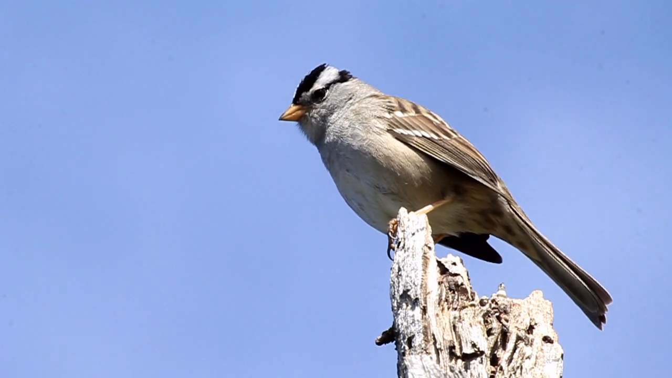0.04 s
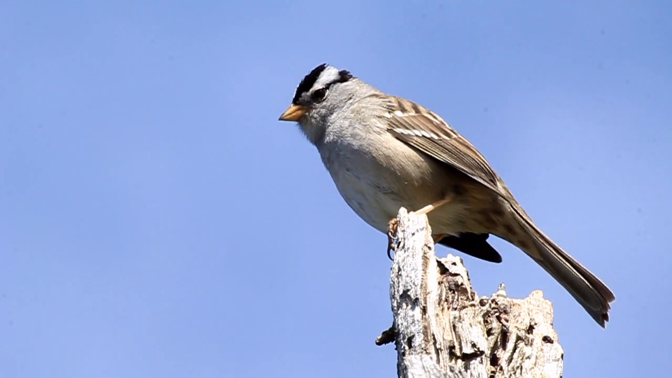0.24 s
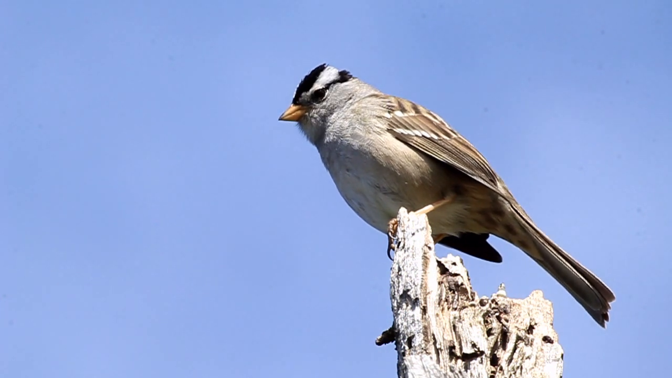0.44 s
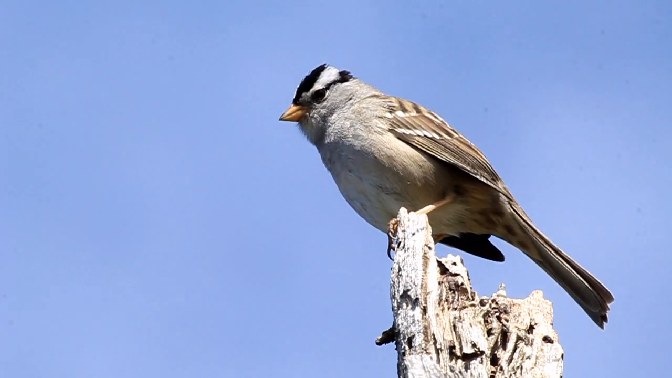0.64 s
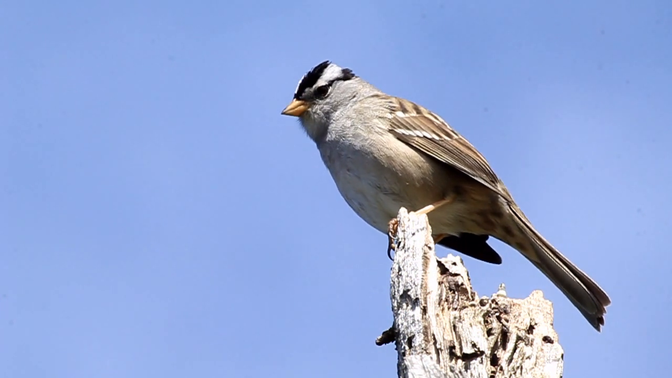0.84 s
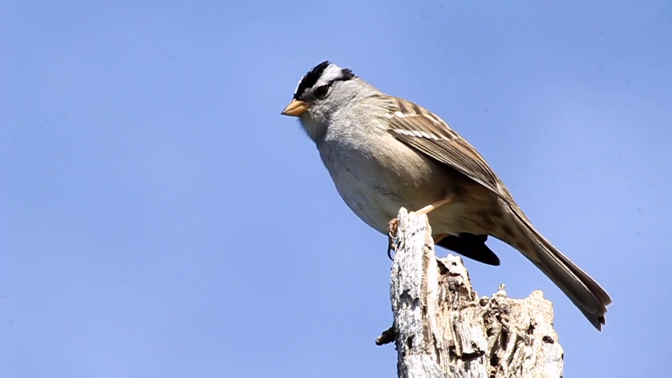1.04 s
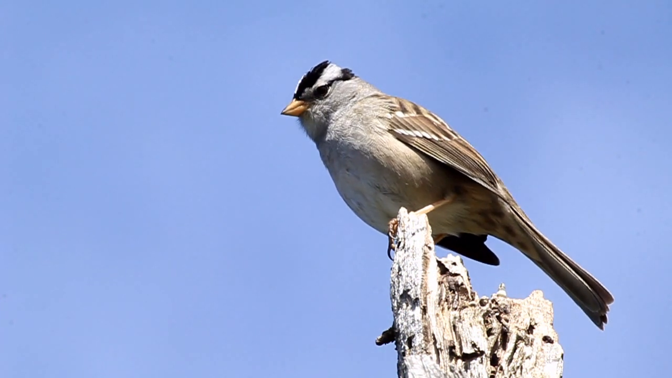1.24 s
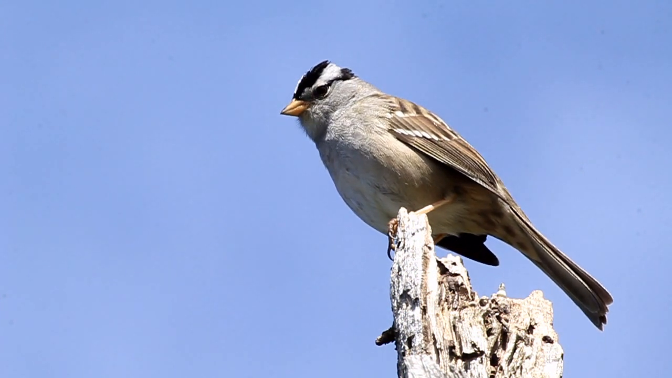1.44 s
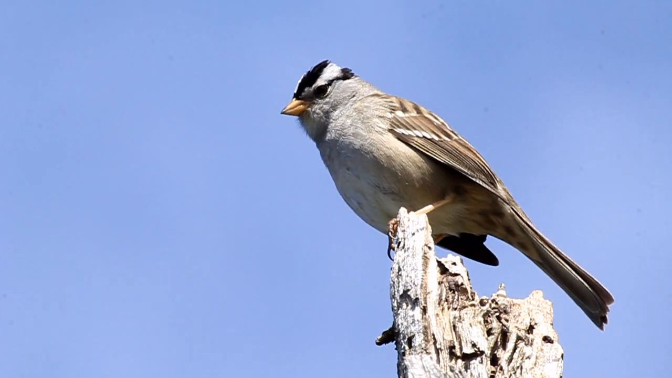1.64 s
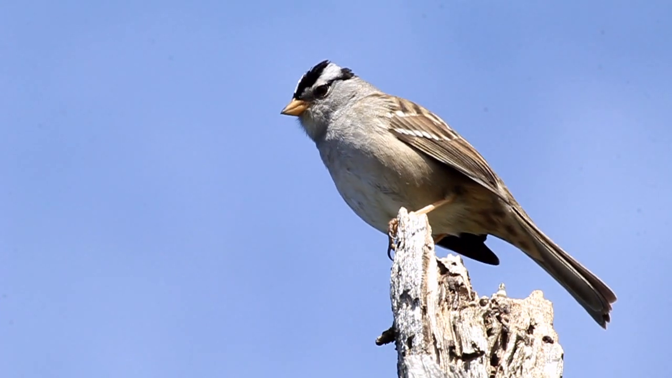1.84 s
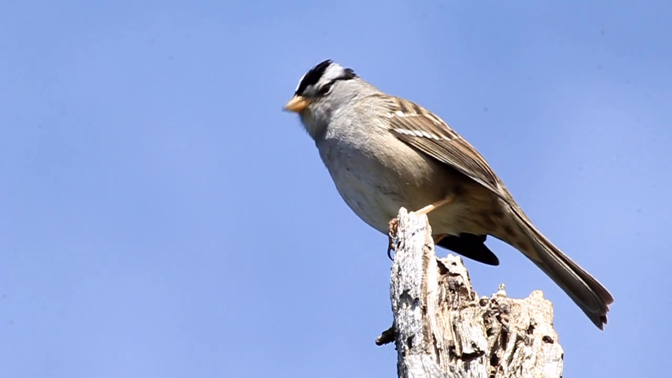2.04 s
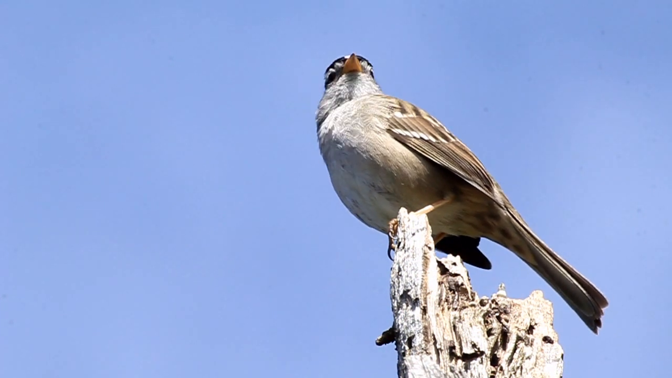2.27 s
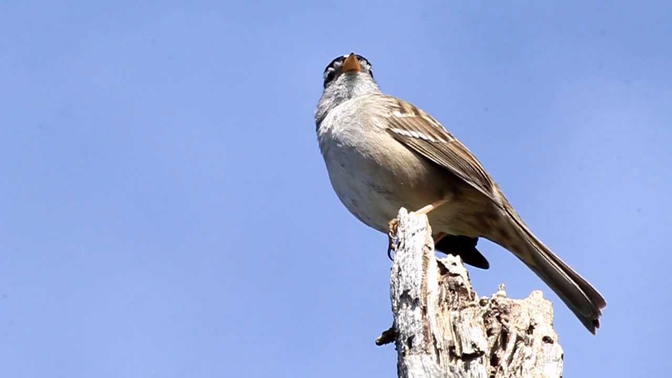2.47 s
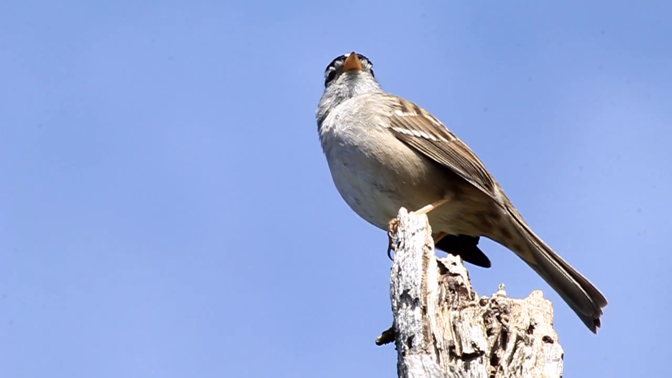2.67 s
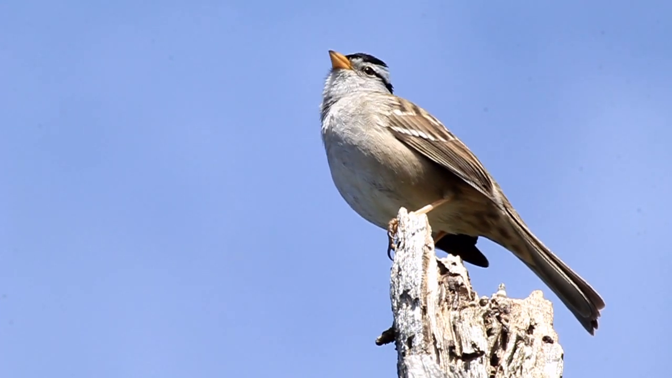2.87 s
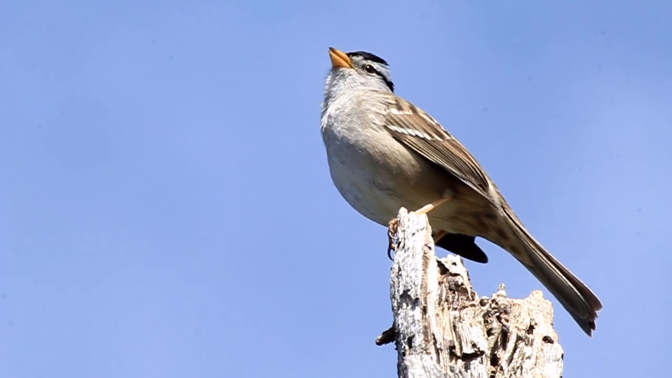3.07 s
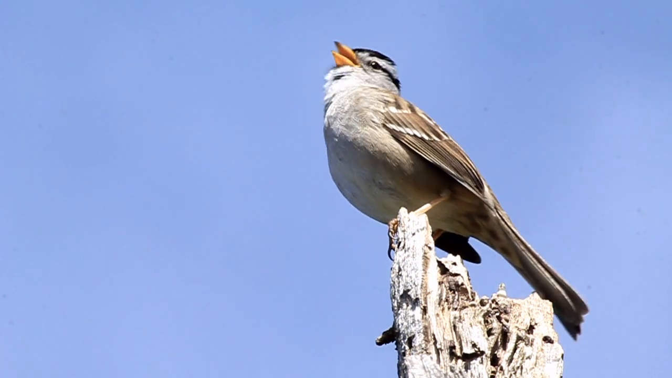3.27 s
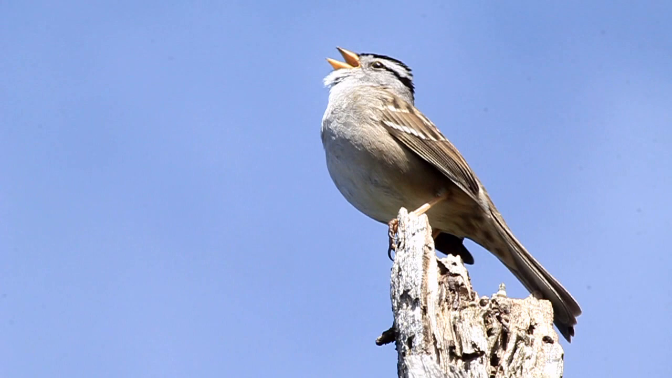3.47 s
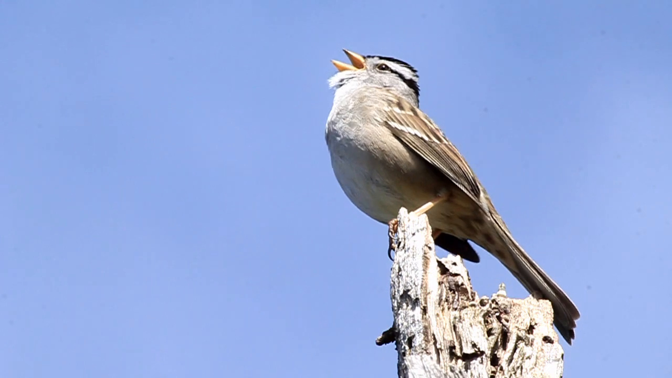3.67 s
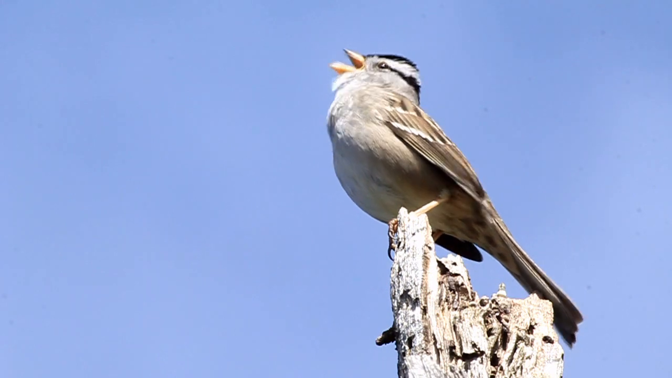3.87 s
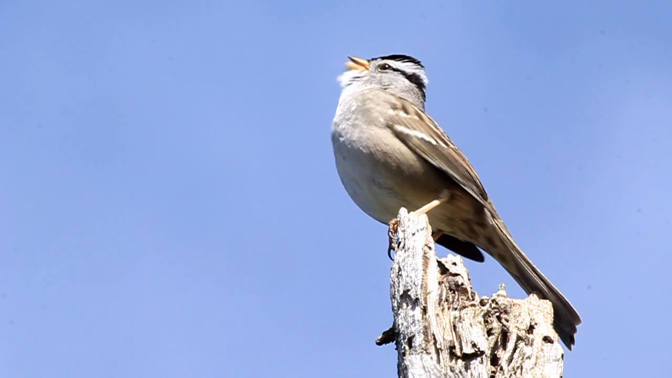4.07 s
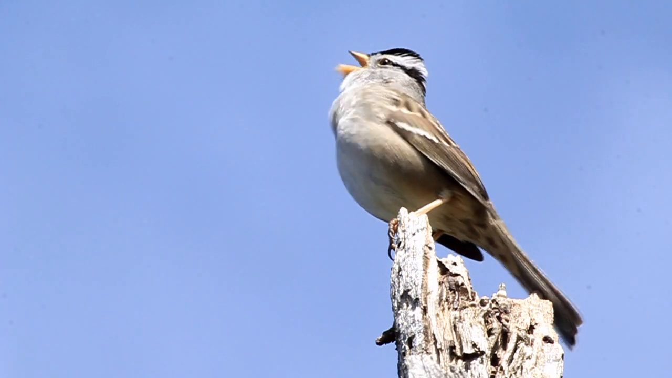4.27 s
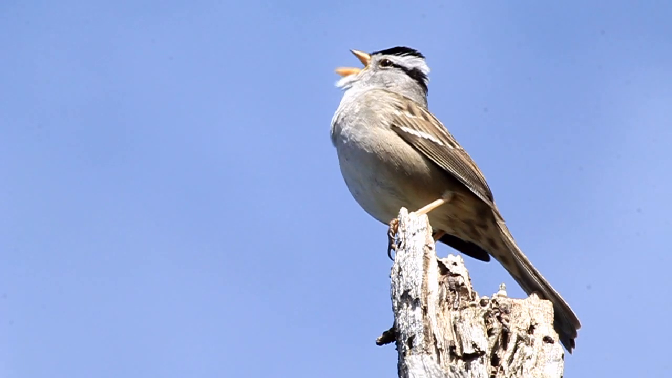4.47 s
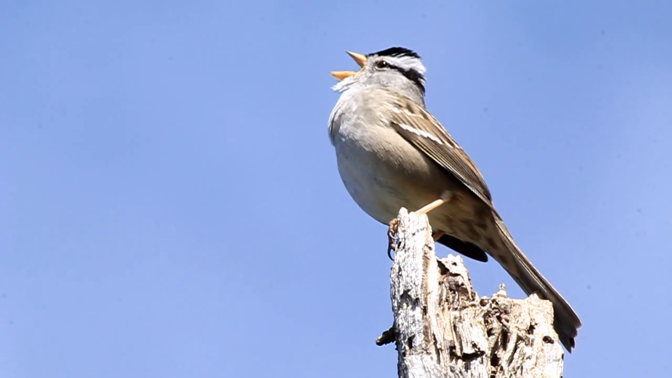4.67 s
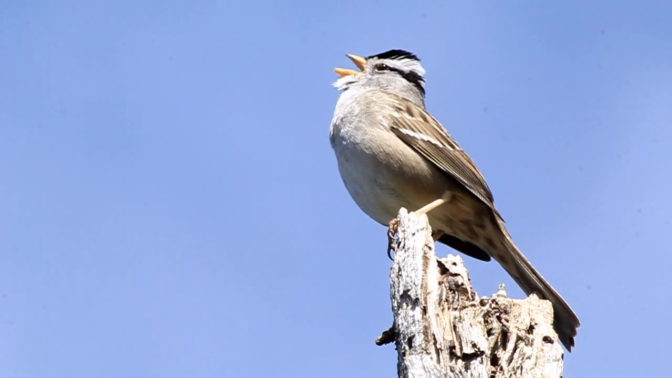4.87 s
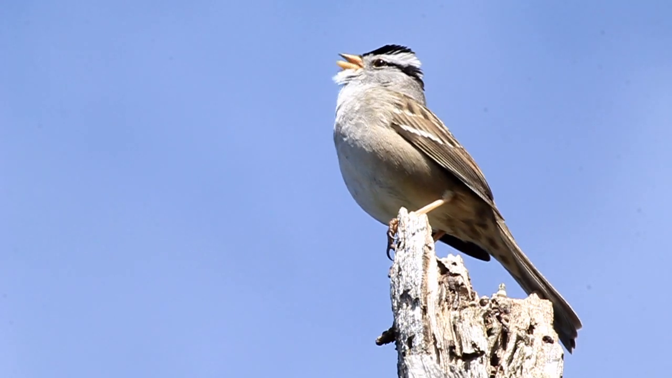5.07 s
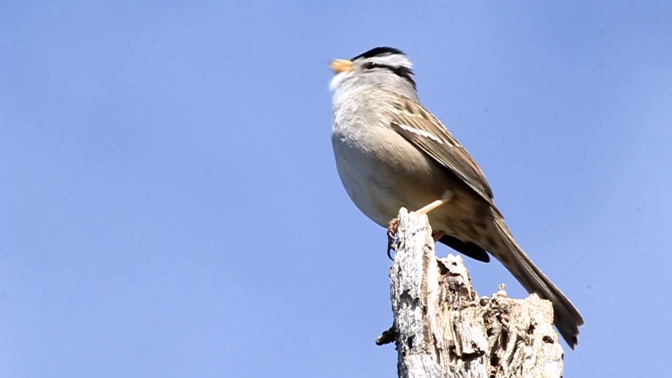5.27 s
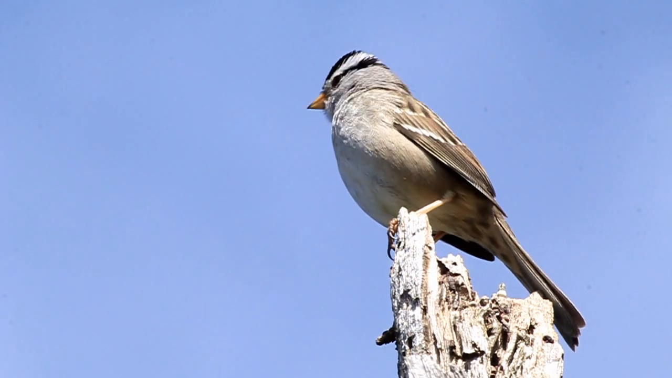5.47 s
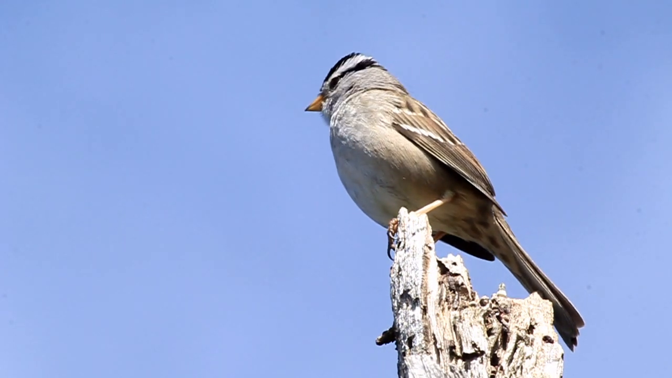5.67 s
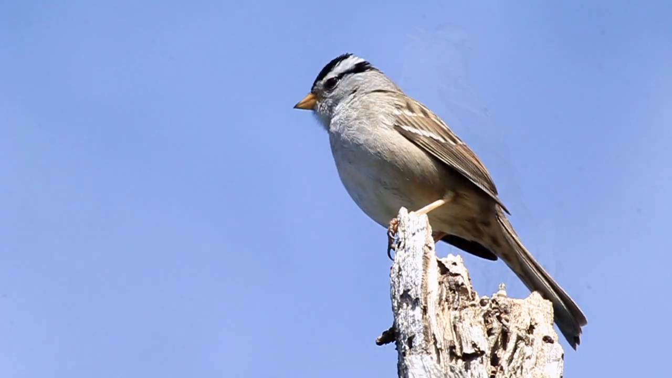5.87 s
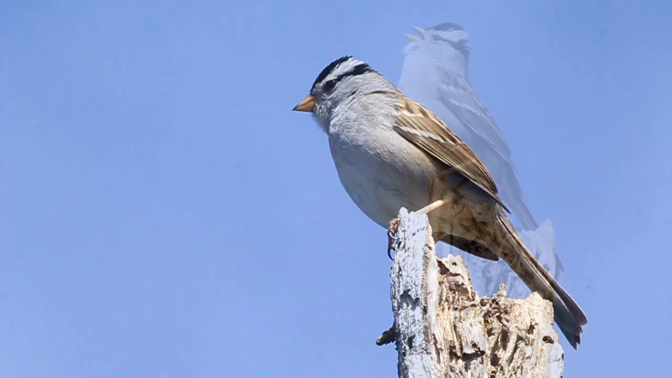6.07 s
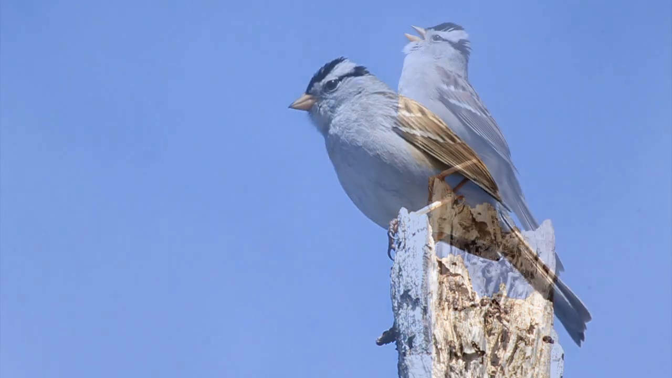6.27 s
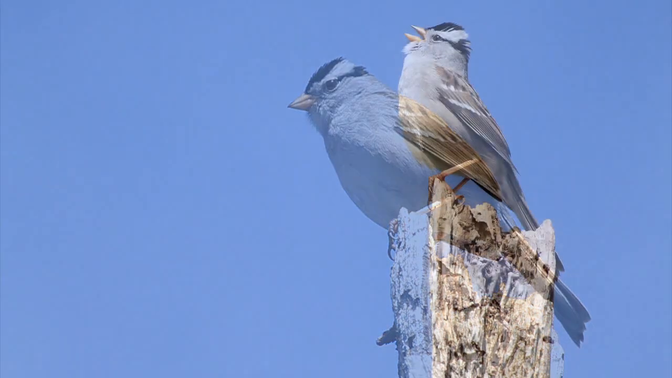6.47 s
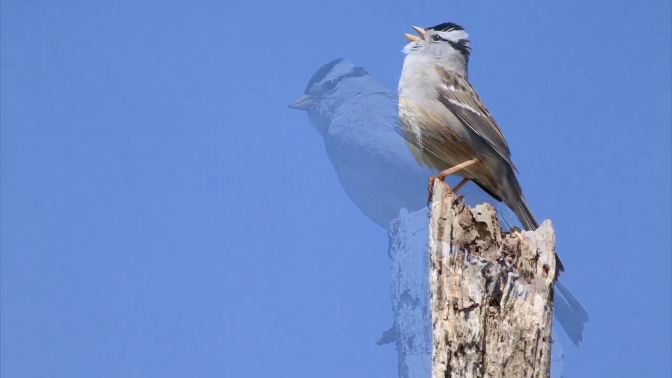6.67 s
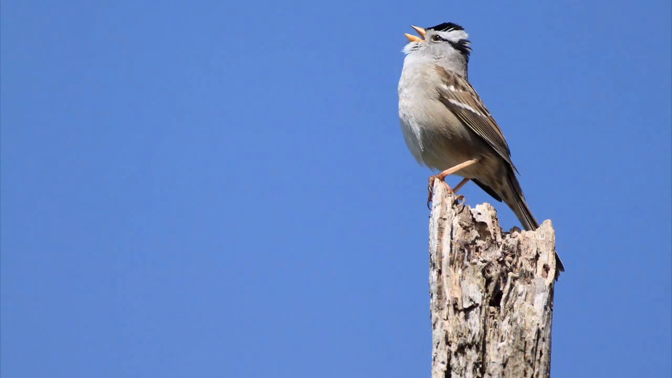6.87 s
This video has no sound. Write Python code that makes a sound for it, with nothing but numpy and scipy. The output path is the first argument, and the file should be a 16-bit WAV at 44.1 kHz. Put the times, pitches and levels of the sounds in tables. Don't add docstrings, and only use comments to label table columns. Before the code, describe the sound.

Outdoors, low rumble and soft hiss with a faint far engine drone. A distant sparrow whistles and sings first, and scattered faint chirps follow. Then a sparrow on a post near the microphone sings much louder: a pure pulsed whistle, quick slurs and trills, a buzz, a falling note. Distant birds and hoarse low calls continue until an abrupt cut.

```python
import sys
import numpy as np
from scipy import signal
from scipy.fft import rfft, irfft
from scipy.io import wavfile
from scipy.ndimage import uniform_filter1d, map_coordinates

SR = 44100
rng = np.random.default_rng(int(sys.argv[2]) if len(sys.argv) > 2 else 0)


def natural_amplitude(level_db):
    exponent = np.asarray(level_db, float) / 20
    return 10 ** exponent


def master(y):
    cut = np.clip(np.atleast_2d(y).T, -1, 1)
    pcm = np.round(cut * 32767)
    wavfile.write(sys.argv[1], SR, pcm.astype(np.int16))


N = 305157


def unit(x):
    return x / np.sqrt(np.mean(x ** 2) + 1e-20)


def along(points, hz):
    f, value = np.transpose(points)
    return np.interp(np.log(hz + 1), np.log(f + 1), value)


def wobble(rate, size=N):
    knots = rng.standard_normal(int(size * rate / SR) + 4)
    return map_coordinates(knots, [np.arange(size) * rate / SR])


def add(track, s, sound):
    track[round(s * SR):][:len(sound)] += sound


def columns(rows):
    s, *cols = np.transpose(rows)
    t = np.arange(s[0], s[-1], 1 / SR)
    return s[0], [uniform_filter1d(np.interp(t, s, c), size=240, mode="nearest") for c in cols]


def rush(spectrum, level, patchy_db):
    top_hz = 13280
    hz, t, z = signal.stft(rng.standard_normal(N + 4096), SR, nperseg=2048)
    patches = uniform_filter1d(uniform_filter1d(rng.standard_normal(z.shape), 14, 0), 3, 1)
    colour = natural_amplitude(along(spectrum, hz)) * (hz < top_hz)
    z = z * colour[:, None] * natural_amplitude(patchy_db * unit(patches))
    noise = signal.istft(z, SR, nperseg=2048)[1][:N]
    return unit(noise) * natural_amplitude(np.interp(np.arange(N) / SR, *np.transpose(level)))


# (frequency [Hz], density [dB per Hz])
AIR_SPECTRUM = [(12, -47.5), (20, -47.5), (64, -2.5), (99, 3), (220, -8), (922, -17.5), (1510, -25),
                (3100, -26.5), (3970, -27.5), (6000, -30), (12300, -33.5), (13300, -38.5), (14500, -86.5)]
# (time [s], level [dB])
AIR_LEVEL = [
    (0, -47),
    (4.33, -47),
    (4.44, -49.5),
    (4.98, -49.5),
    (5.04, -47),
]
# (frequency [Hz], density [dB per Hz])
ENGINE_SPECTRUM = [(55, -32.5), (76, -4), (84, 12), (95, 3.5), (130, -35.5)]
# (time [s], level [dB])
ENGINE_LEVEL = [(0, -56), (.6, -51), (2.1, -50), (2.3, -58), (3.4, -52.5), (4.3, -51), (4.55, -57),
                (5.1, -52), (6.9, -54)]


def distant_rumble():
    air = rush(AIR_SPECTRUM, AIR_LEVEL, patchy_db=0.95)
    return air + natural_amplitude(-2.0) * rush(ENGINE_SPECTRUM, ENGINE_LEVEL, patchy_db=2.2)


# (frequency [Hz], density [dB per Hz])
CHORUS_SPECTRUM = [(1500, -35), (2100, -3), (3000, -3), (4000, 5.5), (5200, -4.5), (6500, -51)]
# (time [s], level [dB])
CHORUS_LEVEL = [(0, -92.5), (1, -73.5), (2.001, -58.5), (3, -66), (5.302, -59.5), (6, -61), (6.9, -53.5)]


def distant_chorus():
    return rush(CHORUS_SPECTRUM, CHORUS_LEVEL, patchy_db=6.0)


def tail(decay, db):
    hz, t, z = signal.stft(rng.standard_normal(SR), SR, nperseg=128)
    fading = z * natural_amplitude(-60 * t / along(decay, hz)[:, None])
    noise = signal.istft(fading, SR, nperseg=128)[1]
    return natural_amplitude(db) * noise / np.linalg.norm(noise)


# (frequency [Hz], decay time to -60 dB [s])
TWIG_DECAY = [(2000, 0.19), (14000, 0.043)]
# (frequency [Hz], decay time to -60 dB [s])
SCRUB_DECAY = [(2000, 1), (4500, 0.88), (8000, 0.9), (14000, 0.2)]
# (delay [s], level [dB])
REFLECTIONS = [
    (.020, -23),
    (.062, -31),
]


def scrub(near_db, tail_db):
    answer = np.pad(tail(TWIG_DECAY, near_db) + tail(SCRUB_DECAY, tail_db), (130, 0))
    for delay, db in REFLECTIONS:
        add(answer, delay, natural_amplitude(db) * rng.standard_normal(144) / 12)
    return answer


def echoed(x, answer):
    band_hz = 15250
    heard = rfft(x + signal.fftconvolve(x, answer)[:N])
    return irfft(heard * (np.fft.rfftfreq(N, 1 / SR) < band_hz), N)


# (frequency [Hz], gain [dB])
THROAT = [(1800, -24), (3300, -13), (4100, -6), (4550, 0), (5100, -7), (6000, -14), (7000, -20),
          (9500, -44)]
# (multiple of the pitch, level [dB])
OVERTONES = [
    (2, -43),
    (3, -38),
    (4, -52),
]
# (frequency [Hz], gain [dB])
BEAK = [(3000, 7), (6200, 14), (7600, 1.5), (10000, -2), (12000, -1.5), (14000, 12), (15200, 3)]


def syrinx(pitch_hz, gain, overtone_db, throat=0, rasp=.22, halo_db=-38):
    size = len(pitch_hz)
    phase = 2 * np.pi * (np.cumsum(pitch_hz) / SR + rng.random())
    halo = natural_amplitude(halo_db) * wobble(1500, size=size)
    tone = natural_amplitude(throat * along(THROAT, pitch_hz)) * (1 + halo) * np.sin(phase)
    push = (gain / natural_amplitude(-20)) ** .3
    for k, db in OVERTONES:
        level = push * natural_amplitude(db + overtone_db + along(BEAK, k * pitch_hz))
        tone = tone + level * np.sin(k * phase + rasp * wobble(2500, size=size))
    return np.sqrt(2) * gain * tone


def glides(rows, swell, flutter_db, overtone_db, throat):
    out = np.zeros(N + SR)
    for s, length, start, middle, end, db in rows:
        u = np.linspace(0, 1, int(length * SR))
        pitch = start * (1 - u) * (1 - 2 * u) + 4 * middle * u * (1 - u) + end * u * (2 * u - 1)
        shape = np.abs(np.sin(np.pi * u)) ** (swell * min(1, .07 / length))
        gain = natural_amplitude(db + flutter_db * wobble(22.1, size=len(u))) * shape
        add(out, s, syrinx(pitch, gain, overtone_db, throat))
    return out[:N]


def slurs(notes, waver, overtone_db, ring_db=0):
    ring_hz, ring_width_hz = 4470, 170
    out = np.zeros(N)
    for note in notes:
        s, (pitch, db) = columns(note)
        edge = signal.windows.tukey(len(pitch), 260 / len(pitch))
        flare = ring_db * np.exp(-((pitch - ring_hz) / ring_width_hz) ** 2)
        lift = .5 * along(THROAT, pitch)
        wavering = pitch * (1 + waver * wobble(90, size=len(pitch)))
        add(out, s, syrinx(wavering, natural_amplitude(db + flare) * edge, overtone_db - lift))
    return out


def breaths(rows, rest_hz):
    settle_s, swell_s, swell_bend = .075, .17, 1.4
    note = []
    for s, length, start, soft_db, full_db in rows:
        t = np.linspace(0, length, num=24)
        rise = np.clip(1 - t / min(swell_s, length), 0, 1) ** swell_bend
        pitch = rest_hz + (start - rest_hz) * np.exp(-t / settle_s)
        note += list(zip(s + t, pitch, full_db - (full_db - soft_db) * rise))
    return note


def chirps(rows):
    depth, rate = (.19, .38), (131, 113)
    ends = rows[0][0], rows[-1][0]
    return [(s, top, np.interp(s, ends, depth), np.interp(s, ends, rate), db) for s, top, db in rows]


def buzz(rows, overtone_db):
    s, (top, depth, rate, db) = columns(rows)
    out = np.zeros(N)
    sounding = .65
    edge = signal.windows.tukey(len(rate), 400 / len(rate))
    for lag, stretch in [(0, 1.0), (.52, 1.04)]:
        turns = np.cumsum(rate) / SR / 2 + 1 - lag + 0.0047 * wobble(51, size=len(rate))
        luck = rng.standard_normal((80, 2))[turns.astype(int)]
        u = np.clip(turns % 1 / sounding, 0, 1)
        climb = (1 - u) ** 2.3
        pitch = stretch * top * (1 - depth * climb + 0.012 * luck[:, 0])
        gain = natural_amplitude(db + luck[:, 1]) * np.abs(np.sin(np.pi * u)) ** 0.95
        add(out, s, syrinx(pitch, gain * edge, overtone_db, throat=0.82, rasp=.7, halo_db=-22))
    return out


# (time [s], peak level [dB])
COOS = [(5.4231, -50), (5.5712, -51), (5.7503, -50), (5.902, -56), (6.0796, -52), (6.1913, -53),
        (6.346, -50), (6.4971, -51), (6.6583, -47.5)]


def hoarse_calls():
    out = np.zeros(N)
    t = np.arange(2400) / SR
    for s, db in COOS:
        carrier = wobble(510, size=len(t)) * np.sin(2 * np.pi * 2080 * t)
        add(out, s, natural_amplitude(db - 7.5) * np.hanning(len(t)) * carrier)
    return out


# (time [s], length [s], start [Hz], end
# [Hz], level [dB])
FAR_STROKES = [(.49, .11, 5440, 4250, -55.5), (.72, .075, 3330, 3700, -56), (.87, .05, 5640, 4100, -52),
               (.895, .058, 4300, 3200, -43), (.95, .017, 5870, 4160, -56), (.99, .03, 3430, 4740, -57),
               (1.01, .12, 5900, 4140, -47.5), (1.07, .06, 4630, 3100, -54.5), (1.2, .06, 5700, 3750, -59),
               (1.31, .095, 5700, 3560, -45), (1.44, .047, 3140, 4470, -45), (1.53, .076, 4800, 3400, -45),
               (1.61, .075, 4200, 3160, -57), (2.05, .2, 4240, 2554, -51), (1.454, .037, 2610, 2190, -60),
               (1.725, .074, 3000, 2260, -60),
               (2.39, .135, 4070, 2680, -50), (2.37, .1, 2850, 2900, -59), (2.47, .105, 2550, 1750, -55),
               (2.53, .07, 3000, 2100, -57), (2.625, .035, 2450, 2920, -58), (2.67, .105, 2680, 1780, -52),
               (2.8, .1, 3410, 2050, -54), (2.87, .09, 2650, 1850, -50), (3.0, .042, 2400, 3600, -56),
               (3.05, .06, 3600, 2350, -58), (3.1, .016, 2000, 1980, -45), (3.22, .025, 3696, 2800, -62.5),
               (3.255, .016, 2020, 2000, -46), (3.33, .055, 2350, 3300, -54),
               (3.67, .06, 3080, 1950, -52.5), (3.67, .033, 3340, 2850, -59), (3.82, .033, 2430, 2780, -54),
               (5.26, .033, 5420, 4340, -55), (5.44, .052, 3680, 3700, -57), (5.59, .06, 5360, 3720, -55),
                (5.77, .085, 5150, 3170, -53), (5.71, .025, 3500, 4000, -58), (5.62, .2, 3800, 3790, -63),
                (6.07, .093, 4260, 3600, -63), (6.19, .06, 5670, 3780, -51.5),
                (6.255, .09, 4000, 2890, -52), (6.28, .038, 2800, 3300, -61), (6.35, .04, 2910, 2560, -61),
                (6.525, .055, 5760, 3720, -49), (6.645, .025, 3400, 4140, -49),
                (6.7, .078, 5400, 3250, -49), (6.765, .04, 2900, 2140, -54), (6.37, .04, 7640, 8040, -54),
                (6.39, .04, 7500, 7280, -62)]
# (time [s], length [s], edge [Hz], crest [Hz], level [dB])
ARCHES = [
    (2.268, .036, 3250, 3900, -57),
    (2.67, .065, 3350, 4200, -58),
    (3.01, .085, 2050, 2680, -51),
    (3.17, .08, 2000, 2700, -52),
    (3.548, .05, 3320, 3020, -52),
]
# (time [s], pitch [Hz], level [dB])
FAR_SCOOP = [
    (1.125, 3150, -56),
    (1.155, 2930, -49),
    (1.19, 3050, -49),
    (1.222, 3420, -46),
]
# (rest [Hz], breaths of (time [s], length [s], start [Hz], soft level [dB], full level [dB]))
FAR_WHISTLES = [
    (3980, [(0, .075, 3990, -66, -59), (.1, .04, 3985, -74, -64), (.16, .055, 3980, -74, -62), (.225, .04, 3980, -68, -66)]),
    (3860, [(.235, .11, 4150, -60, -48), (.358, .14, 4000, -54, -41), (.53, .04, 3880, -52, -43), (.61, .175, 3935, -43, -43)]),
    (4210, [(5.49, .195, 4310, -66, -53), (5.7, .215, 4240, -58, -52), (5.93, .06, 4230, -60, -51), (6.0, .165, 4220, -60, -62)]),
    (3620, [(6.16, .15, 3600, -61, -64), (6.33, .095, 3630, -56, -53), (6.44, .14, 3620, -62, -62)]),
]
# (time [s], top of the chirps [Hz], level [dB])
FAR_BUZZ = [
    (1.68, 5780, -55),
    (1.76, 5400, -52),
    (1.9, 4900, -53.5),
    (1.97, 4700, -58),
]


def neighbours():
    sag = .42
    strokes = [(s, length, a, min(a, b) + sag * abs(a - b), b, db)
               for s, length, a, b, db in FAR_STROKES]
    arches = [(s, length, edge, crest, edge, db) for s, length, edge, crest, db in ARCHES]
    quick = glides(strokes + arches, swell=0.45, flutter_db=2.5, overtone_db=-33, throat=0.28)
    whistles = [breaths(rows, rest_hz) for rest_hz, rows in FAR_WHISTLES]
    held = slurs(whistles + [FAR_SCOOP], waver=0.0015, overtone_db=-30)
    return natural_amplitude(1.8) * quick + hoarse_calls() + held + buzz(chirps(FAR_BUZZ), overtone_db=-32.5)


# (length [s], start [Hz], middle [Hz], end [Hz])
TICK, PLUNGE, TRILL = (.0105, 9500, 6600, 8600), (.0082, 8750, 6270, 3700), (.0078, 4600, 7000, 4150)
CHIP, STOP, GRACE = (.009, 5500, 4000, 3480), (.005, 3670, 3420, 2850), (.049, 7100, 6400, 4800)
# (shape, time [s], pitch factor, level [dB])
FLICKS = [(TICK, 3.8645, 1.0, -13), (GRACE, 3.895, 1.0, -20.5), (PLUNGE, 3.9365, 1.04, -11),
          (TICK, 4.278, 1.0, -11.5), (PLUNGE, 4.376, .98, -12.5), (PLUNGE, 4.383, .84, -14.5),
          (TRILL, 4.389, .86, -10), (PLUNGE, 4.3965, .87, -12), (CHIP, 4.972, .95, -28),
          (CHIP, 4.979, .98, -23.5), (CHIP, 4.9875, .98, -15), (CHIP, 4.9955, 1.05, -14.5),
          (STOP, 3.779, 1.0, -21), (STOP, 4.204, 1.0, -22)]
# (time [s], length [s], start, middle, end [Hz], level [dB])
LANDING = (4.400, .014, 4740, 4250, 4350, -13)


def flicks():
    trill = [(TRILL, 3.9442 + k * .00715, 1, -4.5 - k * 3) for k in range(3)]
    rows = [(s, length, *np.multiply(hz, factor), db)
            for (length, *hz), s, factor, db in FLICKS + trill]
    return glides(rows + [LANDING], swell=.8, flutter_db=0, overtone_db=-1, throat=1)


# (time [s], length [s], start [Hz], soft level [dB], full level [dB])
WHISTLE = [
    (3.22, .134, 4330, -60, -16.5),
    (3.376, .146, 3947, -28, -16.5),
    (3.546, .236, 3900, -25, -13.5),
]
HOOK = [
    (3.877, 3440, -40),
    (3.899, 3526, -21.5),
    (3.907, 3387, -16),
    (3.927, 2880, -38),
    (3.935, 2520, -36),
]
DIVE = [
    (3.967, 6950, -33),
    (3.981, 5630, -20.7),
    (3.989, 5050, -11),
    (3.998, 4700, -21),
    (4.005, 4510, -16),
    (4.019, 4150, -16.5),
    (4.035, 3800, -17),
    (4.055, 3340, -20),
    (4.069, 2876, -31),
]
SCOOP = [
    (4.081, 2643, -33),
    (4.099, 2800, -37),
    (4.123, 3256, -21.5),
    (4.141, 3540, -19.2),
    (4.165, 3595, -17),
    (4.206, 3595, -17),
]
DROP = [
    (4.29, 5240, -41),
    (4.296, 5240, -24),
    (4.308, 5000, -19.5),
    (4.346, 4120, -15),
    (4.368, 3490, -21.5),
    (4.376, 3280, -38),
]
ARC = [
    (4.414, 3030, -37),
    (4.43, 3320, -21),
    (4.448, 3920, -16),
    (4.466, 4740, -23),
    (4.486, 4800, -17.5),
    (4.526, 4060, -16.5),
    (4.56, 3346, -19.5),
    (4.568, 3100, -32),
]
ENDING = [
    (5.002, 3800, -25),
    (5.028, 3556, -18.5),
    (5.055, 3260, -21),
    (5.088, 2904, -29),
    (5.158, 2445, -36.5),
    (5.198, 2220, -39.5),
    (5.256, 2030, -46),
]
# (time [s], top of the chirps [Hz], level [dB])
BUZZ = [
    (4.626, 4900, -27.5),
    (4.66, 4880, -15),
    (4.73, 4720, -10),
    (4.843, 4520, -12),
    (4.853, 4450, -15.5),
    (4.919, 4200, -19),
]


def sparrow():
    song = [breaths(WHISTLE, rest_hz=3825), HOOK, DIVE + SCOOP, DROP, ARC, ENDING]
    slurred = slurs(song, waver=0.0007, overtone_db=0, ring_db=6.5)
    return slurred + flicks() + buzz(chirps(BUZZ), overtone_db=2.5)


def scene():
    background = distant_rumble() + distant_chorus()
    far = echoed(neighbours(), scrub(near_db=-10.5, tail_db=-15.5))
    near = echoed(sparrow(), scrub(near_db=-18, tail_db=-24))
    mono = background + far + near
    return np.array([mono, mono])


def roll_off(x):
    return signal.sosfilt(signal.butter(12, 15710, fs=SR, output="sos"), x)


def record(dry):
    cut, offset = 302344, .1322
    after = np.arange(N) >= cut
    mix = np.where(after, [[offset], [0]], dry)
    return roll_off(mix)


dry = scene()
out = record(dry)
master(out)
```